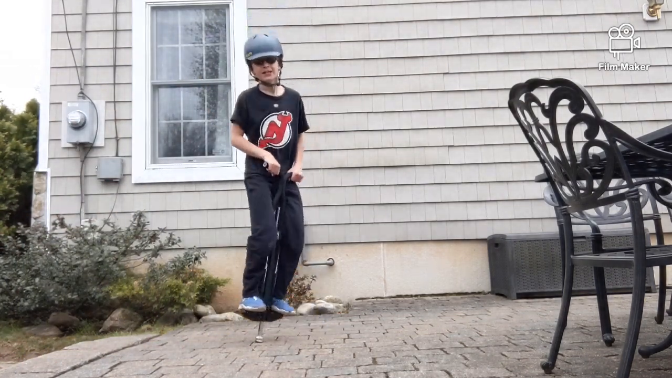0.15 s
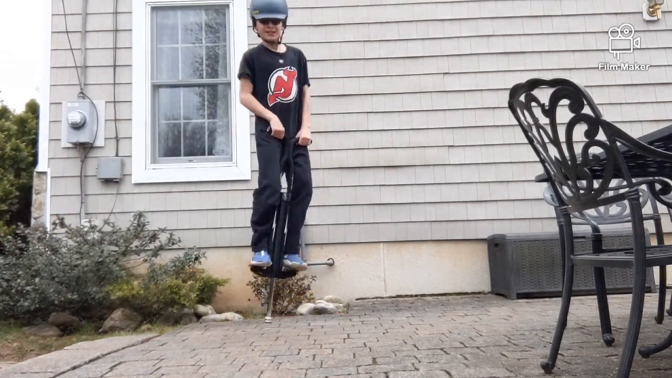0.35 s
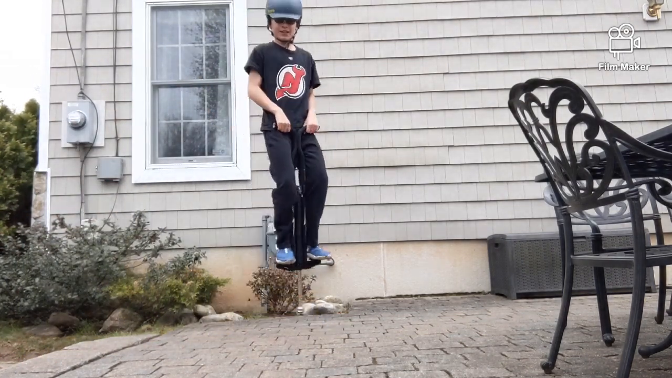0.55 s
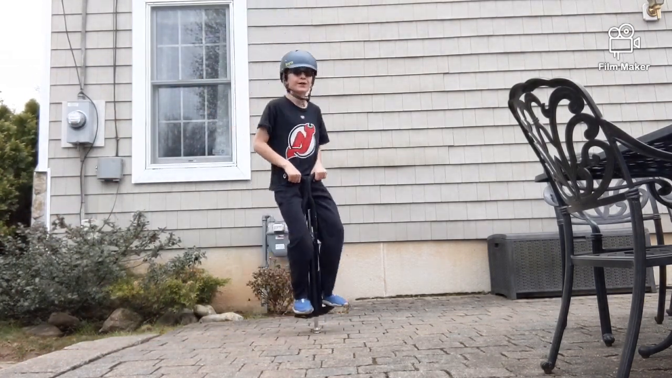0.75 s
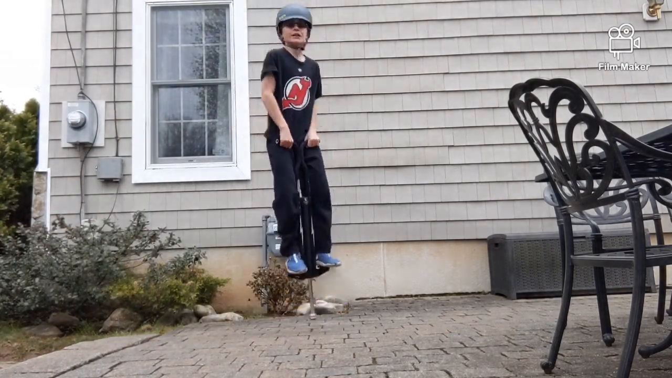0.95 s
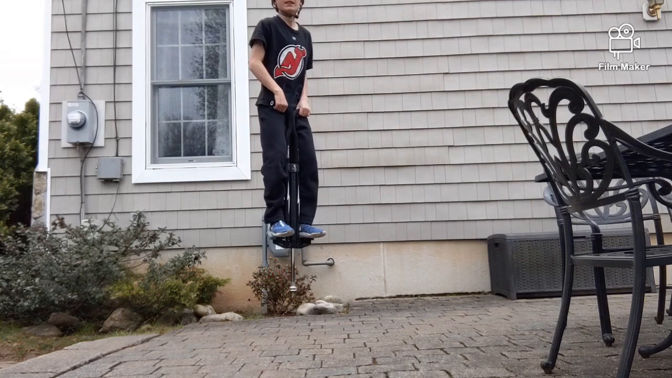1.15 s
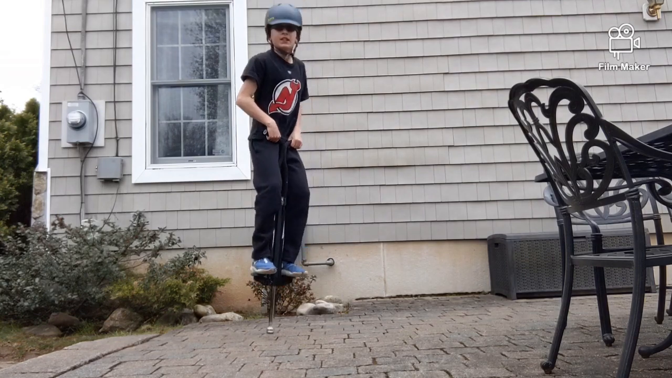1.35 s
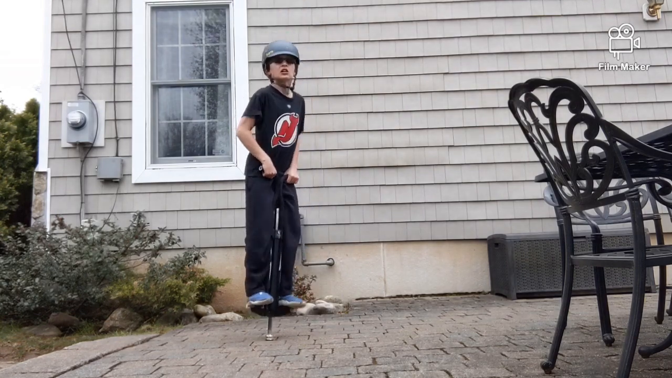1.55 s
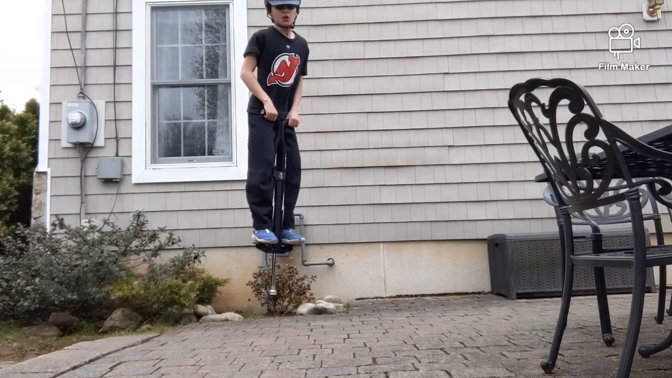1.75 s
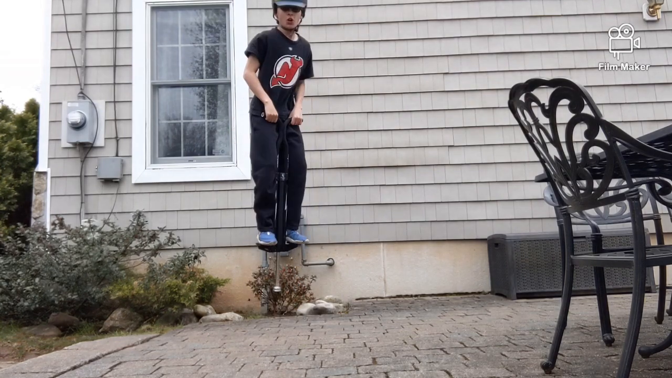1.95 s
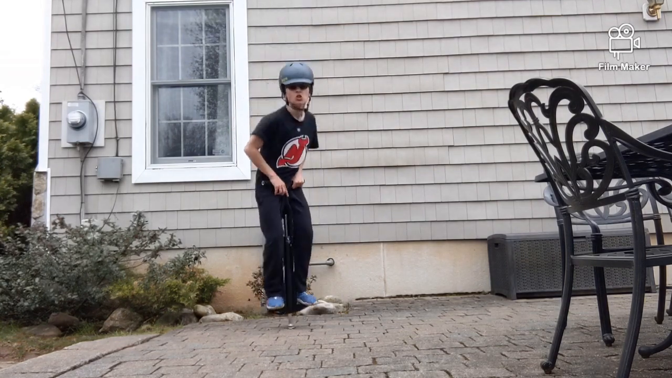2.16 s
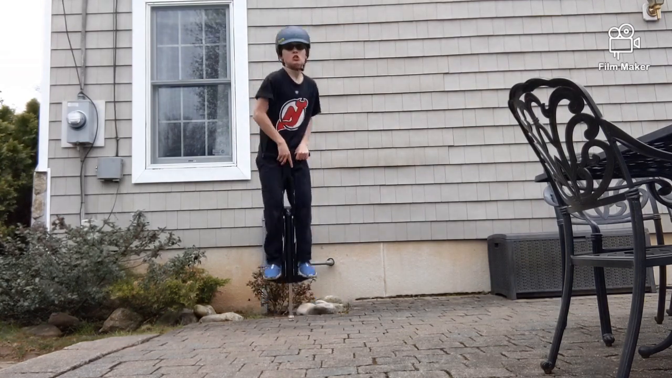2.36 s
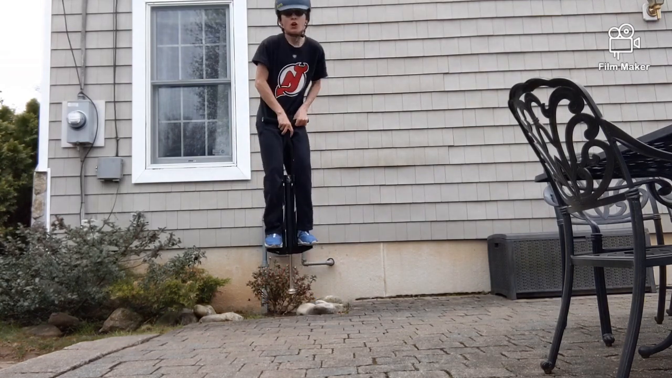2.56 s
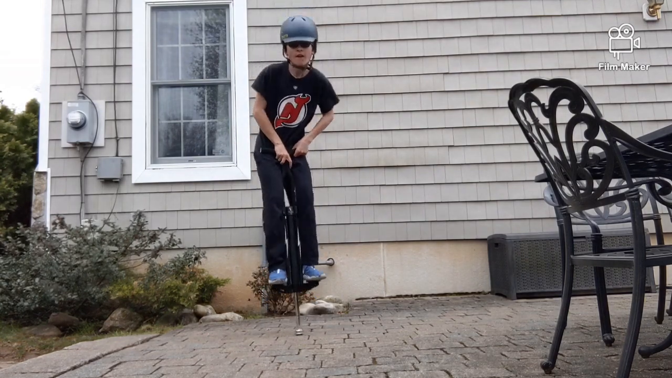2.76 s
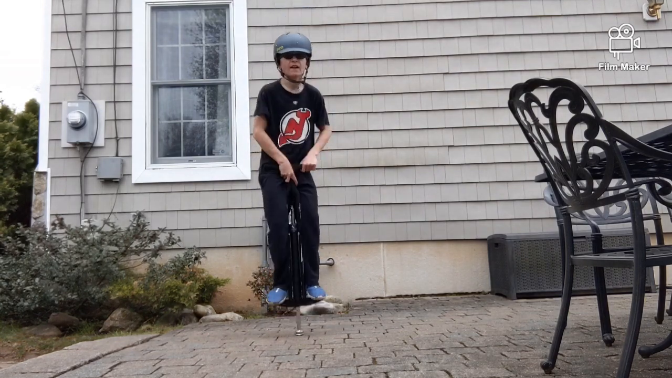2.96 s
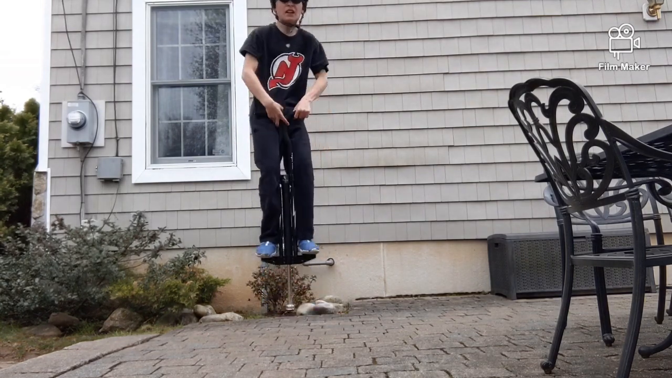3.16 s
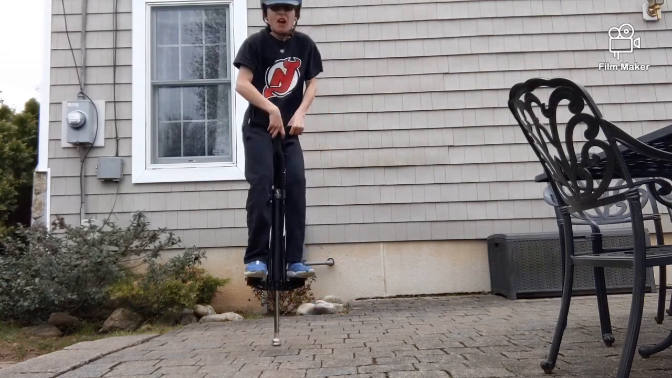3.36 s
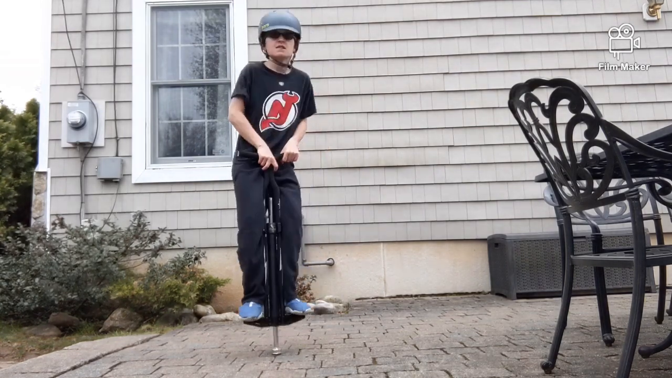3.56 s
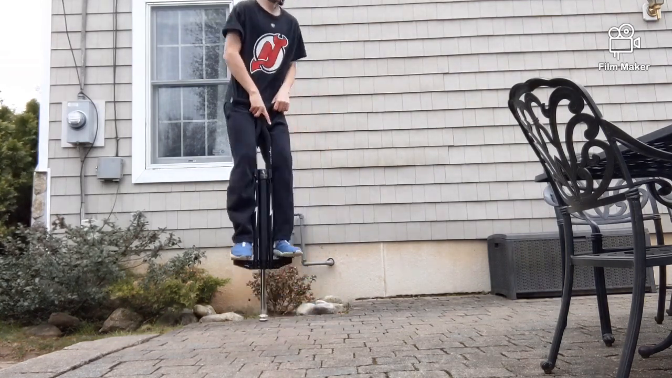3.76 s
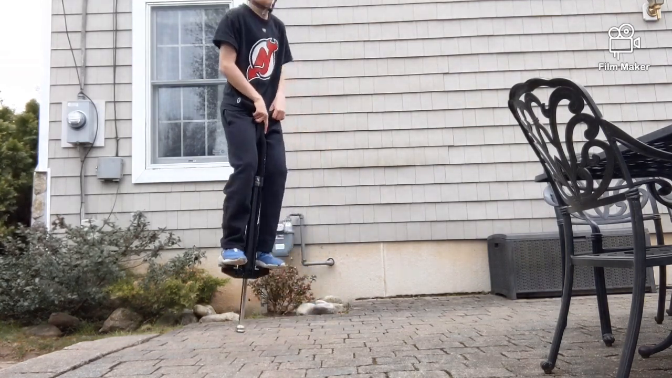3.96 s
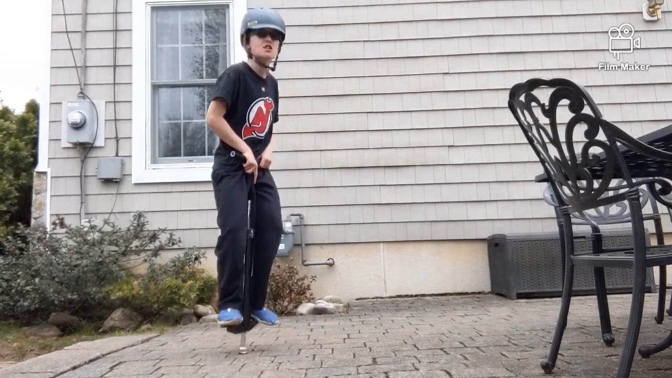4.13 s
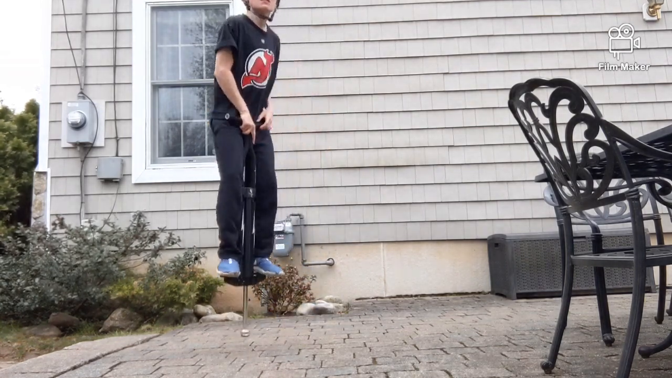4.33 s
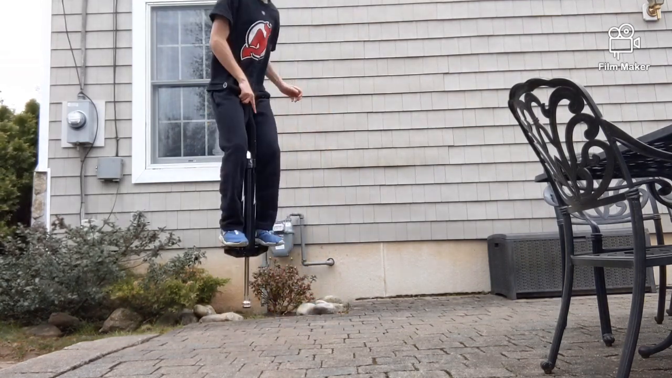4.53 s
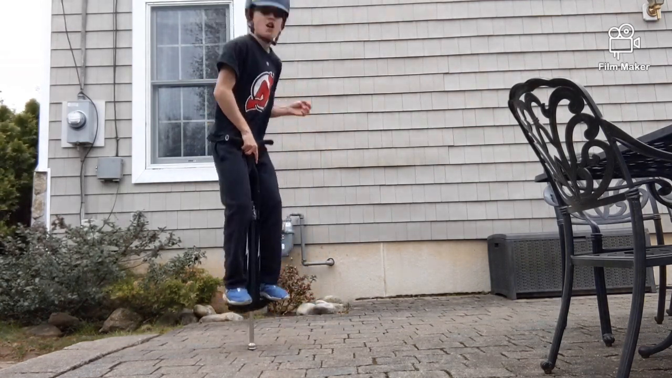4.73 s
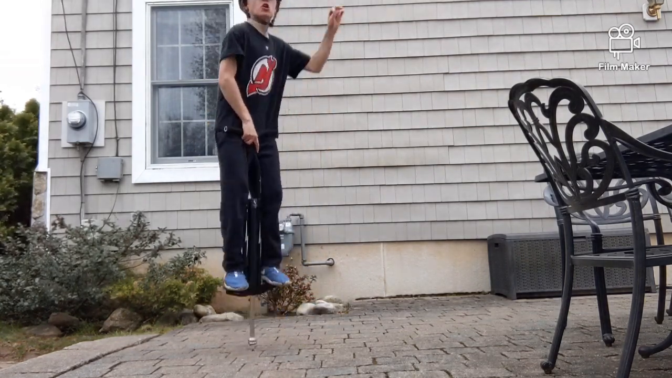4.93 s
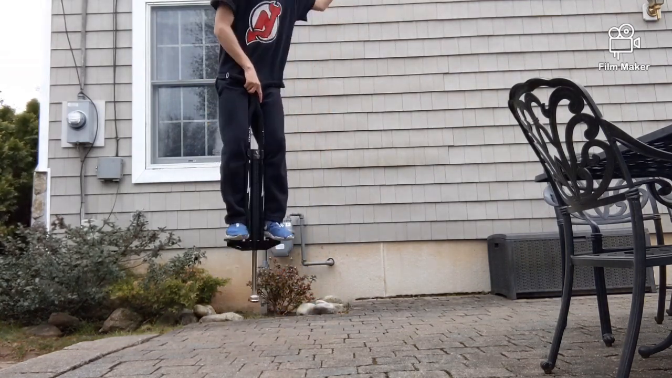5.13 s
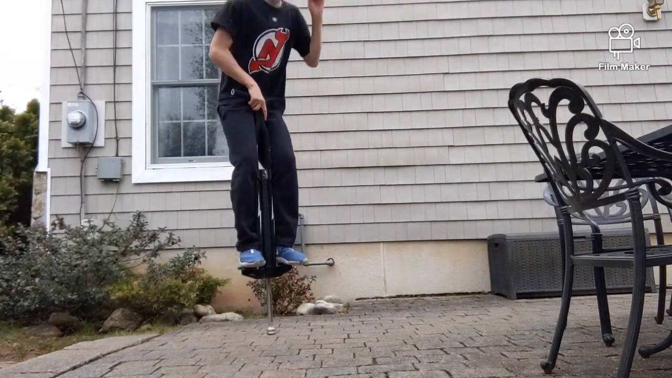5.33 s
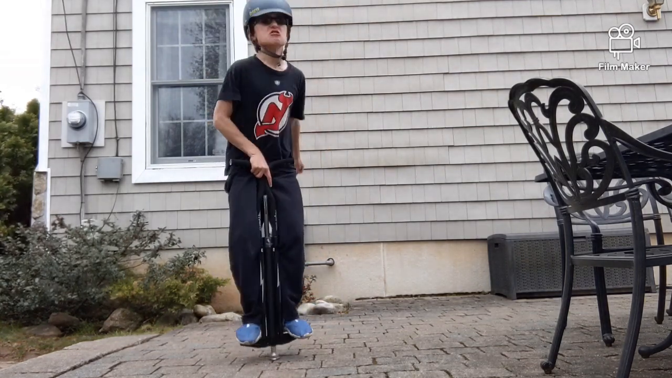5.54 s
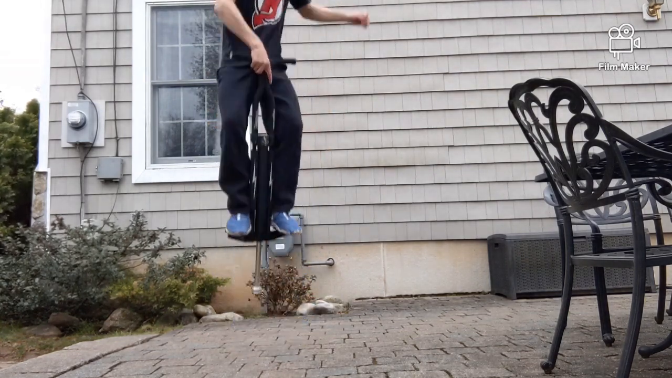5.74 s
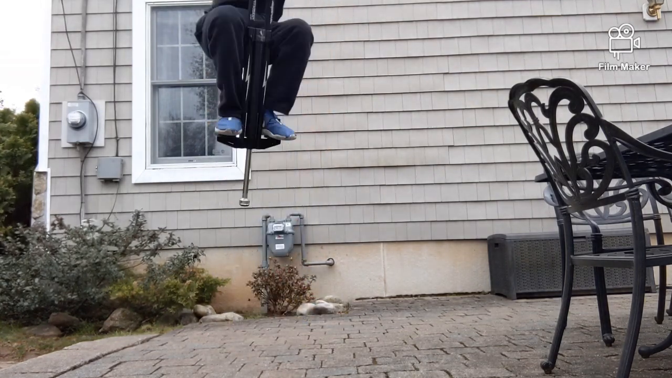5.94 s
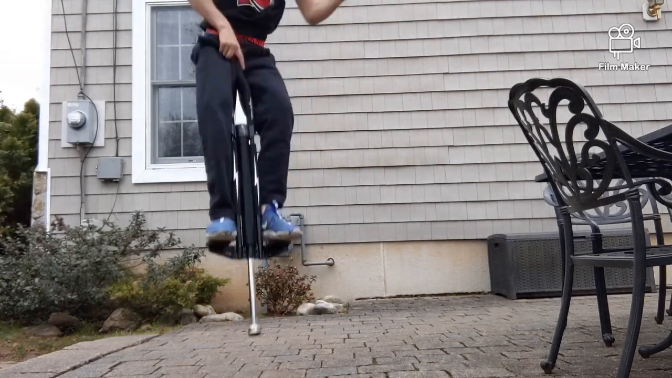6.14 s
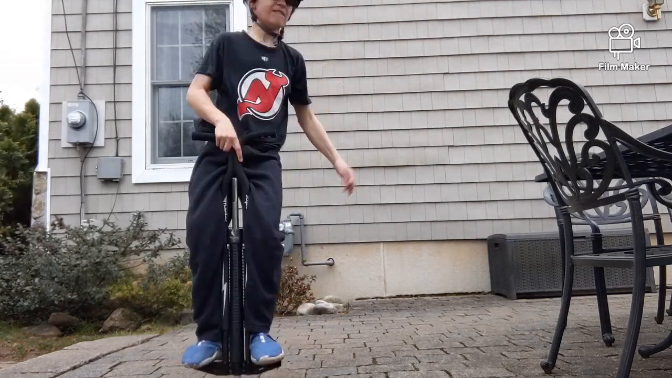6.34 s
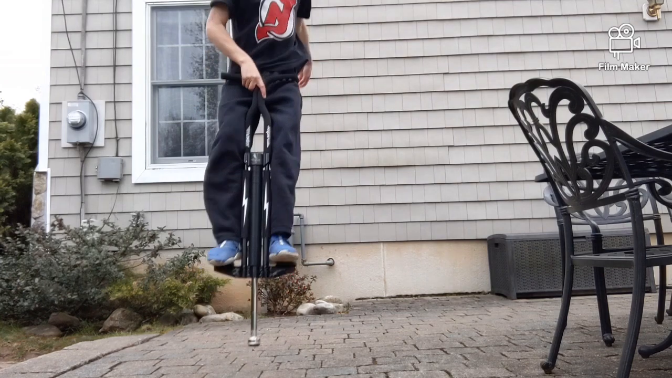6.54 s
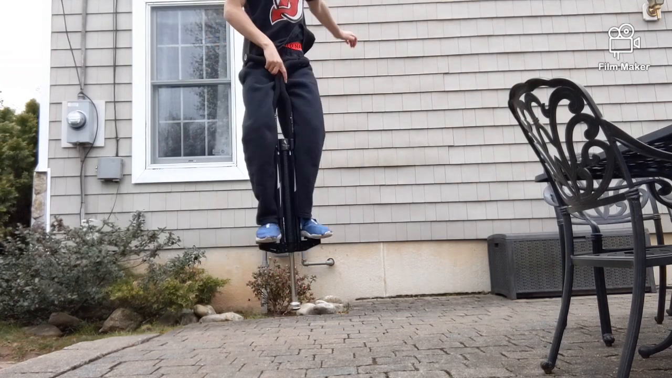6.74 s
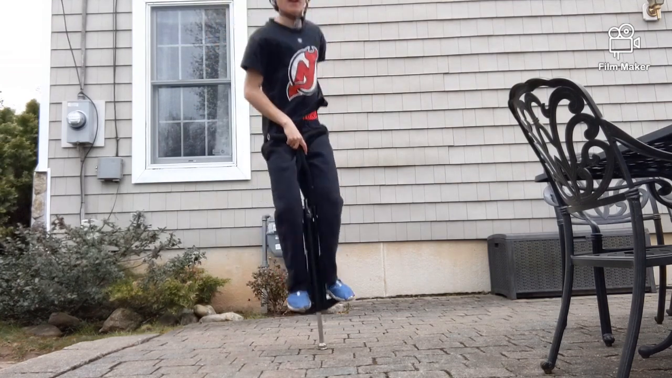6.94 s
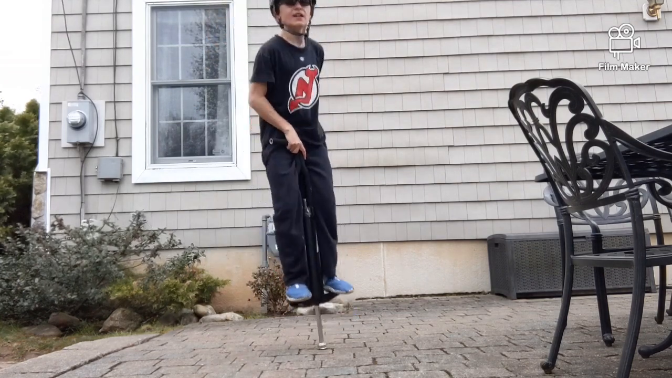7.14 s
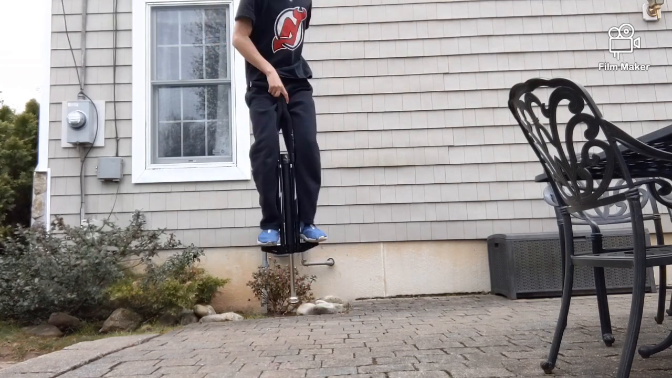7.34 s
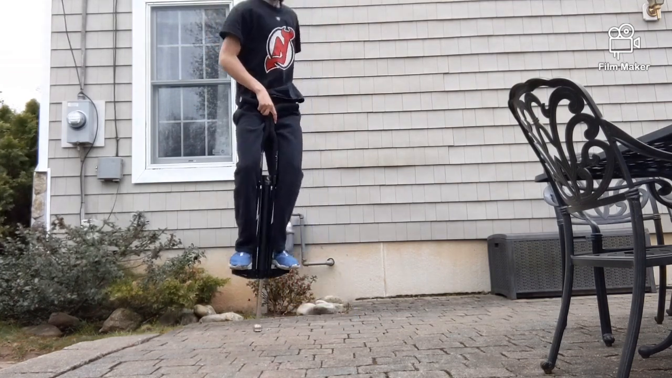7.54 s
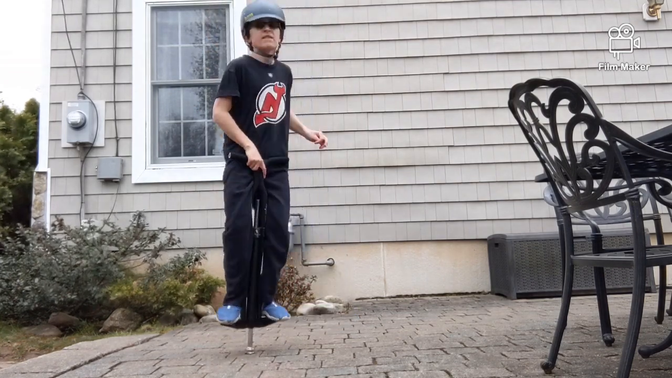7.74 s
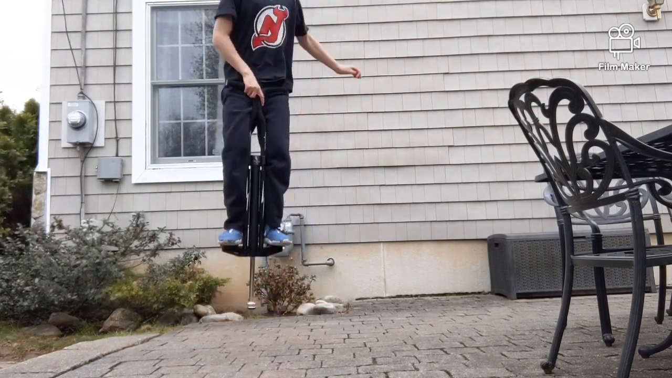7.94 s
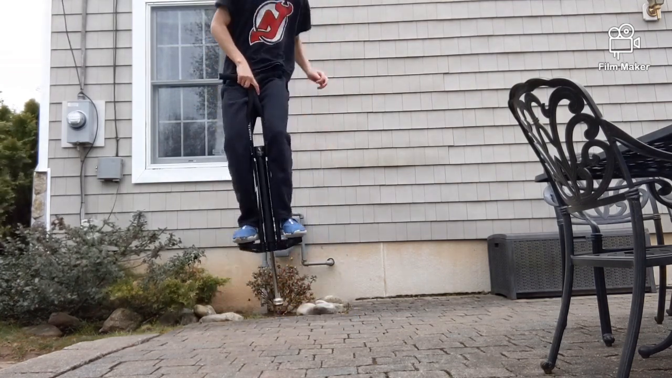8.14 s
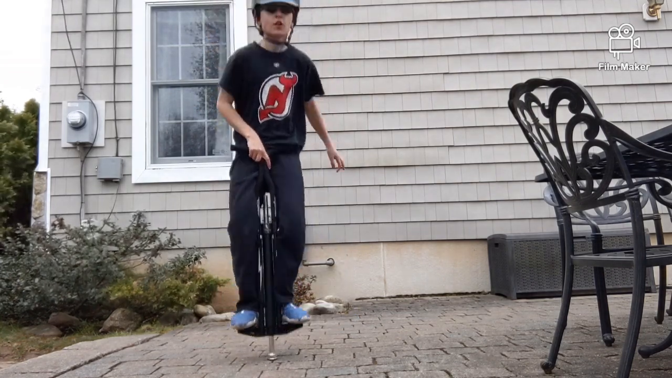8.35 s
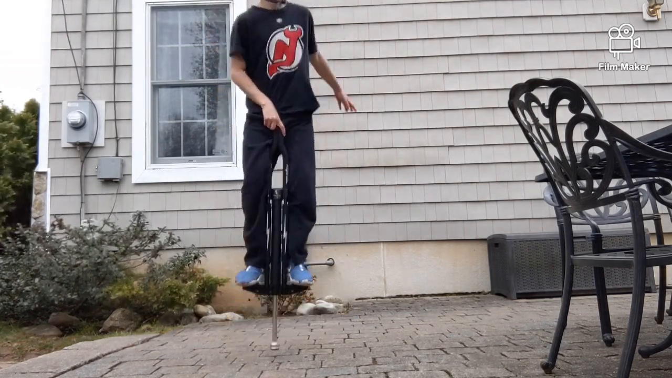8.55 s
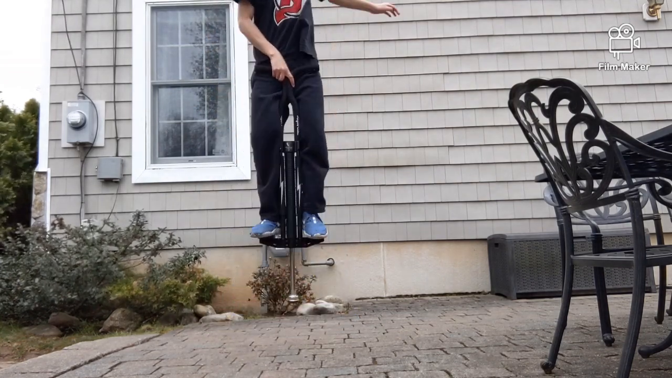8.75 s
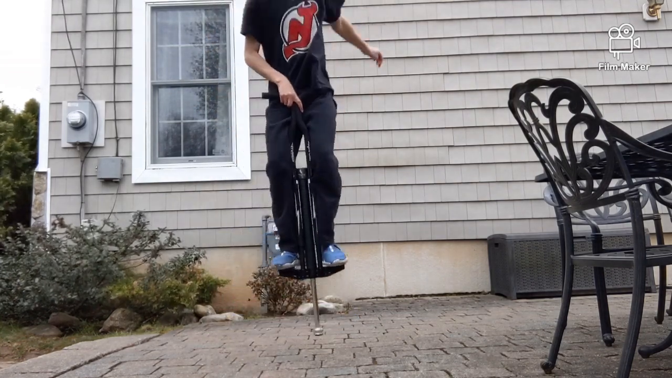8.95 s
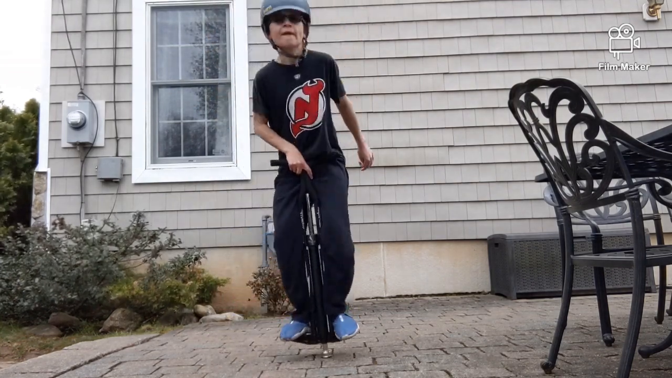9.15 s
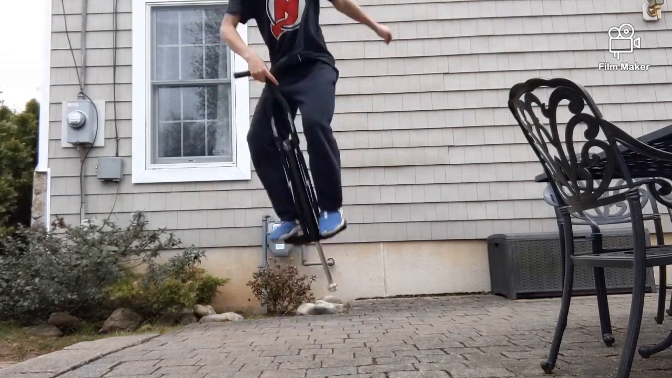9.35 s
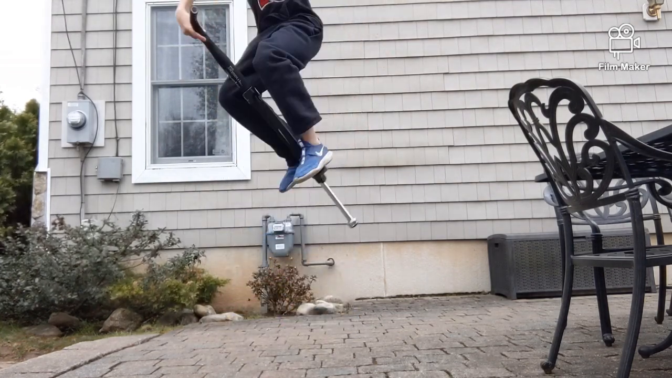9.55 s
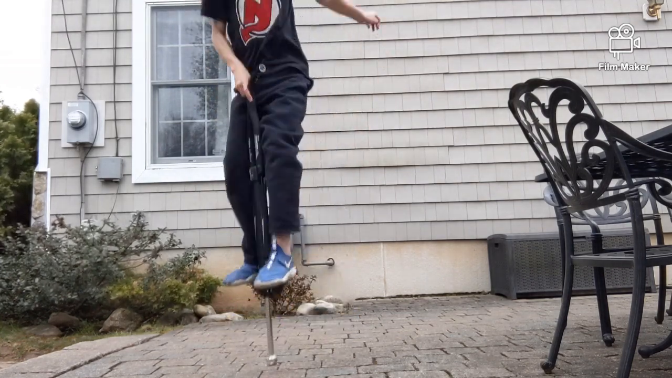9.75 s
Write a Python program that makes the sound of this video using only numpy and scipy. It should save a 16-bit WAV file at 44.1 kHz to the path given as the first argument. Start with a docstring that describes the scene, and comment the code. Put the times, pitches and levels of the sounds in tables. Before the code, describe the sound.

A pogo stick bounces steadily on a stone patio, each landing clacking and scraping, then snapping metallically at lift-off, with occasional squeaks.

```python
"""A stone patio in front of a house wall; a pogo stick bounces about three times in two seconds.
Each bounce: the foot thuds on the stone, shaft and spring scrape down, halt, scrape up again, and the
shaft snaps against its top stop. These are shaped noise bursts, and resonators ring as the steel tube.
Some strokes squeak as gliding tones; a light breeze, slow filtered noise, touches the microphone's two ports."""
import sys
import numpy as np
from scipy import signal
from scipy.fft import rfft, irfft, next_fast_len
from scipy.io import wavfile

SR = 44100
rng = np.random.default_rng(int(sys.argv[2]) if len(sys.argv) > 2 else 0)


def bounce(signal):
    """Save signal as a 16-bit WAV file at the path given by the first command-line argument."""
    frames = np.transpose(np.atleast_2d(signal))
    limited = np.clip(frames, -1, 1)
    pcm = np.round(limited * 32767).astype(np.int16)
    wavfile.write(sys.argv[1], SR, pcm)


N = 431738
TIME = np.arange(N) / SR


def from_db(db):
    """Decibels to gain."""
    return 10 ** (np.asarray(db) / 20)


def rms_one(x):
    """Scale to unit rms."""
    return x / np.sqrt(np.mean(x ** 2) + 1e-20)


def at_hz(points, hz):
    """Read a table on a log-frequency axis."""
    freq, value = np.transpose(points)
    return np.interp(np.log(hz + 1), np.log(freq), value)


def add(track, s, sound):
    """Mix a sound into a track at a time in seconds."""
    start = max(round(s * SR), 0)
    track[..., start:start + sound.shape[-1]] += sound[..., :N - start]


def lowpass(x, hz):
    """Gentle second-order low-pass."""
    return signal.sosfilt(signal.butter(2, min(hz, .45 * SR), fs=SR, output="sos"), x + 1e-18)


def highpass(x, hz, order):
    """Butterworth high-pass."""
    return signal.sosfilt(signal.butter(order, hz, "high", fs=SR, output="sos"), x)


def colour(x, spectrum, lift_db=0, size=1024):
    """Causal (minimum-phase) filter of unit power with this spectrum, its treble lifted above 5 kHz."""
    hz = np.fft.rfftfreq(size, 1 / SR)
    treble_db = lift_db * at_hz([(5000, 0), (9000, 1)], hz)
    gain = rms_one(from_db(at_hz(spectrum, hz) + treble_db))
    # fold the cepstrum onto positive times so that nothing sounds before the contact
    cepstrum = irfft(np.log(gain))
    cepstrum[1:size // 2] *= 2
    cepstrum[size // 2 + 1:] = 0
    response = irfft(np.exp(rfft(cepstrum)))
    return signal.fftconvolve(np.atleast_2d(x), response[None], axes=-1)


def resonance(x, hz, width_hz):
    """Two-pole band-pass with gain 1 on top."""
    r = np.exp(-np.pi * width_hz / SR)
    feedback = [1, -2 * r * np.cos(2 * np.pi * hz / SR), r * r]
    return signal.lfilter(np.array([1, 0, -1]) * (1 - r * r) / 2, feedback, x + 1e-18)


def slow(n, hz):
    """Random wander of spread 1."""
    return rms_one(lowpass(rng.standard_normal(n + SR // 10), hz)[-n:])


WIND_DB, WIND_RISE_DB_PER_S, GUST_DB, WASH_DB = -52.5, 0.54, 1.3, -54.5   # the breeze slowly freshens
# The garden air as the microphone hears it. Each row: frequency in Hz, relative spectrum level in dB per Hz.
GARDEN_COLOUR = [(15, -38), (25, 1), (82, -3.5), (229, -21), (309, -18.5), (394, -23), (560, -21.5),
                 (607, -19), (1130, -25.5), (1700, -26.5), (2220, -31), (3160, -30), (6050, -40.5),
                 (9840, -41), (16000, -48.5)]
# How alike that air is at the two ports. Each row: frequency in Hz, left-right correlation from -1 to 1.
AIR_LIKENESS = [(30, .1), (70, 0.6), (150, 0.97), (500, 0.63), (1500, 0.078), (5000, 0.11)]


def garden():
    """Lumpy wind on the ports under a smooth distant wash."""
    size = next_fast_len(N)
    hz = np.fft.rfftfreq(size, 1 / SR)
    mid, side = rfft(rng.standard_normal((2, size))) * from_db(at_hz(GARDEN_COLOUR, hz))
    alike = np.clip(at_hz(AIR_LIKENESS, hz), -1, 1)
    air = np.sqrt(1 + alike) * mid + np.sqrt(1 - alike) * side * [[1], [-1]]
    low = 1 / (1 + (hz / 160) ** 4)   # wind lies mostly below 160 Hz, the wash above
    wind = rms_one(irfft(air * low, size)[:, :N])
    wash = rms_one(irfft(air * (1 - low), size)[:, :N])
    wind_db = WIND_DB + WIND_RISE_DB_PER_S * TIME + GUST_DB * slow(N, hz=10)
    return wind * from_db(wind_db) + wash * from_db(WASH_DB)


def scatter(t, t60, alike_below_hz):
    """Stereo reflections of unit power that die away; long waves reach both ports alike."""
    own = rng.standard_normal((2, len(t)))
    shared = rng.standard_normal(len(t))
    both = highpass(own, alike_below_hz, order=2) + lowpass(shared, alike_below_hz)
    return rms_one(both * from_db(-60 * t / t60)) / np.sqrt(len(t))


LEAD_S = 12 / SR   # room for the front skirt of a fractional delay


def surroundings(lag_us, ground_s, wet_db, low_t60, high_t60):
    """The paths from one spot to the two ports: direct, off the paving, and round the yard."""
    t = TIME[:SR // 2]
    arrival = (t - LEAD_S - np.array([[lag_us], [0]]) * 1e-6) * SR   # in samples; the left port lags
    paving = 0.23 * lowpass(np.sinc(arrival - ground_s * SR), hz=3520)
    direct = np.sinc(arrival) + paving
    high = scatter(t, high_t60, alike_below_hz=1220)
    low = 1.87 * lowpass(scatter(t, low_t60, alike_below_hz=1300), hz=2330)
    return direct + from_db(wet_db) * (high + low) * (1 - np.exp(-t / 0.0046))


# Pick-up of the microphone's two ports. Each row: frequency in Hz, left minus right in dB.
PORT_BALANCE = [(300, 0), (900, 0.5), (1800, 3.5), (2600, 1.5), (6000, 2), (9000, -1), (12500, -4),
                (16000, -3)]


def patio(x):
    """Every bounce lands on a new spot with reflections of its own; each port has its own colour."""
    out = np.zeros((2, N))
    starts = [max(round((row[0] - .01) * SR), 0) for row in LANDINGS]
    for start, end, (*_, lag_us) in zip(starts, starts[1:] + [N], LANDINGS):
        paths = surroundings(lag_us, ground_s=.0031, wet_db=-9.5, low_t60=0.35, high_t60=0.16)
        add(out, start / SR - LEAD_S, signal.fftconvolve(x[:, start:end], paths, axes=-1))
    size = next_fast_len(N + SR // 10)
    balance_db = at_hz(PORT_BALANCE, np.fft.rfftfreq(size, 1 / SR))
    sides = from_db(balance_db * np.array([[.5], [-.5]]))
    return irfft(rfft(out, size) * sides, size)[:, :N]


# Loose parts that stir in mid-air. Each row: start in seconds, level in dB, centre in Hz, width in Hz.
RATTLES = [(4.386, -59, 10000, 3000), (6.096, -54, 10000, 500), (9.613, -46.5, 3360, 700),
           (9.618, -48.5, 10700, 1490)]


def rattles():
    """Spring and pegs rub briefly as the rider shifts in the air: swelling bands of noise."""
    out = np.zeros(N)
    t = TIME[:SR // 10]
    swell = t / 0.006 * np.exp(1 - t / 0.0062)
    for s, db, hz, width_hz in RATTLES:
        rub = rms_one(resonance(rng.standard_normal(len(t)), hz, width_hz))
        add(out, s, from_db(db) * swell * rub)
    return out


def squeak(pitch_hz, rough):
    """Stick-slip: a short gliding tone whose pitch jitters by the share `rough`."""
    n = len(pitch_hz)
    turn = 2 * np.pi * np.cumsum(pitch_hz * (1 + rough * slow(n, 250))) / SR
    tone = np.sin(turn) + .2 * np.sin(2 * turn)
    return np.sqrt(np.hanning(n)) * (1 + .3 * slow(n, 120)) * tone


# the shaft turns round this long after landing; pitch climbs to either side
BOTTOM_S, SQUEAK_BEND_PER_S2 = .145, 20.8
# under a heavy load the spring grinds in a falling tone
GRIND_AT_S, GRIND_LENGTH_S, GRIND_START_HZ, GRIND_END_HZ, GRIND_DB = 6.228, .07, 2800, 1059, -25.5
# Squeaks of the bushing. Each row: start in seconds, length in seconds,
# pitch at the bottom of the stroke in Hz, level in dB.
SQUEAKS = [(.115, .09, 833, -38.5), (.205, 0.073, 840, -40.5), (.825, 0.049, 860, -35),
           (1.53, 0.032, 843, -42), (2.137, 0.091, 887, -41), (2.243, 0.073, 813, -34),
           (2.847, .07, 966, -44.5), (6.351, 0.033, 784, -36)]


def squeaks():
    """On some strokes the bushing binds and squeaks, lowest where the shaft turns round; once the spring grinds."""
    out = np.zeros((2, N))
    bottoms = np.array(LANDINGS)[:, 0] + BOTTOM_S
    for s, length, hz, db in SQUEAKS:
        nearest = bottoms[np.argmin(abs(bottoms - s))]
        from_bottom = s + TIME[:round(length * SR)] - nearest
        pitch_hz = hz * (1 + SQUEAK_BEND_PER_S2 * from_bottom ** 2)
        add(out, s, from_db(db) * squeak(pitch_hz, rough=.025))
    falling_hz = np.geomspace(GRIND_START_HZ, GRIND_END_HZ, round(GRIND_LENGTH_S * SR))
    add(out, GRIND_AT_S, from_db(GRIND_DB) * squeak(falling_hz, rough=.12))
    return out


# Ringing of tube and spring. Each row: frequency in Hz, width in Hz, gain over the contact noise in dB.
TUBE_MODES = [(620, 87, -13.5), (890, 70, -4), (1194, 190, -2.5), (1718, 130, -2), (2035, 100, -5.5),
              (3490, 770, -0.5), (3690, 30, -11.5), (9660, 40, -1.5), (9350, 43, -1), (10400, 360, -13.5),
              (12300, 70, -10.5)]


def tube(x):
    """Every contact also sets the steel ringing: parallel resonators beside the contact itself."""
    return x + sum(from_db(db) * resonance(x, hz, width) for hz, width, db in TUBE_MODES)


def radiated(n, apart_hz=1300):
    """Noise of a long vibrating tube: its short waves reach the two ports only partly alike."""
    own = highpass(rng.standard_normal((2, n)), apart_hz, order=1)
    return rms_one(rng.standard_normal(n) + .55 * own)


COIL_SWING = 0.98   # how strongly the coil resonances come and go in the scrape


def rasp(n):
    """Friction grains, coloured by coil resonances that come and go as the spring rubs along the tube."""
    grains = radiated(n) * from_db(rng.uniform(-7, 7, n))
    coils = np.geomspace(1000, 5000, num=12) * rng.uniform(.93, 1.07, 12)
    ringing = sum(COIL_SWING * slow(n, 14) * resonance(grains, hz, hz / 14) for hz in coils)
    return rms_one(grains + ringing)


# Colour of sliding friction and of the foot's scuff. Each row: frequency in Hz, relative level in dB per Hz.
SCRAPE_COLOUR = [(200, -30), (450, -12), (750, -11.5), (950, -8.5), (1700, -9), (2400, -9), (3500, -5.5),
                 (5000, -4.5), (7300, -13), (8700, -6.5), (9500, -3), (10600, -6.5), (12000, -13.5),
                 (15000, -18.5)]


def scrape(envelope, lift_db):
    """One slide of the shaft: friction with a slightly uneven grip."""
    n = len(envelope)
    grip_db = 1.0 * slow(n, hz=108.7)
    return colour(rasp(n) * envelope * from_db(grip_db), SCRAPE_COLOUR, lift_db)


# going down, the scrape starts at once, sags a little, and dies as the spring brings the rider to a halt
DESCENT_DB, DESCENT_HOLD_S, SAG_DB_PER_S, HALT_DB_PER_S = -29.5, 0.093, 7.5, 517.5
DESCENT_LIFT_DB, LIFT_PER_LOAD = 1, .4   # a heavier load scrapes brighter (dB per dB)
# going up, it swells and fades as a bell: its peak as a share of the time on the ground, its width
REBOUND_PEAK_SHARE, REBOUND_WIDTH_S = .83, 0.023


def slides():
    """Shaft and spring scrape down after each landing and up before each lift-off, hushed in between."""
    out = np.zeros((2, N))
    t = TIME[:SR // 3]
    halt_db = HALT_DB_PER_S * np.maximum(t - DESCENT_HOLD_S, 0)
    descent = from_db(DESCENT_DB - SAG_DB_PER_S * t - halt_db)
    for s, load_db, *_ in LANDINGS:
        add(out, s, from_db(load_db) * scrape(descent, DESCENT_LIFT_DB + LIFT_PER_LOAD * load_db))
    for (s, *_), (off_s, _, rebound_db, lift_db) in zip(LANDINGS, TOP_OUTS):
        ground_s = off_s - s
        from_peak_s = t - REBOUND_PEAK_SHARE * ground_s
        rebound = np.exp(-.5 * (from_peak_s / REBOUND_WIDTH_S) ** 2) * (t < ground_s)
        add(out, s, from_db(rebound_db) * scrape(rebound, lift_db))
    return out


# Shudder of pegs and frame. Each row: frequency in Hz, relative level in dB per Hz.
SHUDDER_COLOUR = [(50, -23), (120, 1.5), (165, -16), (260, 2), (390, -1.5), (480, -9), (620, -3.5),
                  (1000, -25.5), (4000, -67)]


def shudder(t60):
    """The frame's many low modes die away together."""
    t = TIME[:SR // 3]
    return colour(rng.standard_normal(len(t)) * from_db(-60 * t / t60), SHUDDER_COLOUR, size=4096)


def impact(spectrum, lift_db, rise_s, crack_t60, rattle_db, rattle_t60):
    """A hard crack of many close modes, then a weaker buzz of loose parts."""
    t = TIME[:SR // 4]
    decay = from_db(-60 * t / crack_t60) + from_db(rattle_db - 60 * t / rattle_t60)
    envelope = decay * (1 - np.exp(-t / rise_s))
    return colour(radiated(len(t)) * envelope, spectrum, lift_db)


JOLT_DB, RECOIL_DB, RECOIL_S = -28.5, -18, .042   # frame jolt and second touch, against the snap
# Colour of the top stop. Each row: frequency in Hz, relative level in dB per Hz.
SNAP_COLOUR = [(120, -21.5), (270, -12), (700, -13), (1700, -7.5), (3500, -4.5), (5000, -3), (7300, -8),
               (9500, 1), (11000, -4), (15000, -14.5)]
# The shaft hits its stop at lift-off. Each row: time in seconds, snap level in dB,
# level in dB of the scrape that leads up to it, treble lift of that scrape in dB.
TOP_OUTS = [(0.279, -16.5, -29.5, 2), (0.9015, -14, -27.5, 3.5), (1.599, -13.5, -26.5, -1),
            (2.3382, -16, -24.5, 5.5), (3.0066, -15, -31.5, 2), (3.6347, -14.5, -26.5, 1),
            (4.2722, -15.5, -30, -1), (4.932, -14, -26, 4), (5.6327, -8.5, -24.5, 5), (6.451, -11, -24, 1),
            (7.1457, -13, -28.5, 4), (7.8234, -12.5, -24.5, 3.5), (8.526, -13.5, -26.5, 1.5),
            (9.2392, -9, -24, 4.5)]


def top_outs():
    """The spring throws the shaft against its stop: the tube pings, the frame jolts and the shaft rebounds once."""
    out = np.zeros((2, N))
    for s, snap_db, *_ in TOP_OUTS:
        snap = from_db(snap_db) * impact(SNAP_COLOUR, lift_db=0.45, rise_s=0.00014, crack_t60=0.028,
                                         rattle_db=-16.5, rattle_t60=0.2)
        ping = from_db(2) * resonance(snap, hz=9280, width_hz=16)
        add(out, s, snap + ping)
        add(out, s, from_db(snap_db + JOLT_DB) * shudder(t60=0.14))
        again_s = rng.normal(RECOIL_S, .002)
        recoil = impact(SNAP_COLOUR, lift_db=-11, rise_s=0.00068, crack_t60=0.037,
                        rattle_db=-19, rattle_t60=0.09)
        add(out, s + again_s, from_db(snap_db + RECOIL_DB) * recoil)
    return out


def push(hz, t60):
    """The rubber tip squashes against the stone: little more than one slow cycle."""
    t = TIME[:SR // 20]
    return np.sin(2 * np.pi * hz * t) * from_db(-60 * t / t60) * (1 - np.exp(-t / 0.0021))


# a squarer landing thuds more and cracks brighter: ordinary thud, its clack's treble lift, dB of lift per dB of thud
USUAL_THUD_DB, CLACK_LIFT_DB, LIFT_PER_THUD = -36.5, 5.5, 0.75
PUSH_DB, SCUFF_DB = 18, -20   # rubber tip above the thud; scuff against the clack
# Colour of the clack. Each row: frequency in Hz, relative level in dB per Hz.
CLACK_COLOUR = [(200, -2), (700, -9), (1700, -2.5), (3500, -2.3), (5000, -1), (7300, -12.5), (9500, -1.5),
                (11000, -5.5), (15000, -17)]
# The foot meets the stone. Each row: time in seconds, load on the spring in dB above an ordinary bounce,
# clack level in dB, thud level in dB, lag of the left port in microseconds.
LANDINGS = [(0.0325, -2.5, -18, -39, 71), (0.652, -3.5, -20.5, -35.5, 39.5),
            (1.363, -2.5, -19.5, -35.5, 70), (2.0803, -3.5, -19.5, -39, 58), (2.7652, -2, -16, -39, 57),
            (3.3831, -2, -16.5, -36, 66.6), (4.02, -2, -18.5, -38.5, 86), (4.6845, -1, -16.5, -34.5, 81),
            (5.3976, 2.5, -16.5, -33, 71), (6.2013, 5.5, -10.5, -33, 86), (6.9056, 1.5, -16.5, -34.5, 39.4),
            (7.5796, 0, -17.5, -37, 83), (8.2818, 4, -9.5, -39, 71), (9.0018, 2.5, -16, -34, 29.6),
            (9.7584, 5.5, -16.5, -33, 68)]


def landings():
    """The rubber foot scuffs and thuds, then the slack in the stick closes with a clack."""
    out = np.zeros((2, N))
    for s, _, clack_db, thud_db, _ in LANDINGS:
        lift_db = CLACK_LIFT_DB + LIFT_PER_THUD * (thud_db - USUAL_THUD_DB)
        add(out, s - .003, from_db(thud_db + PUSH_DB) * push(hz=190, t60=0.028))
        scuff = colour(np.linspace(0, 1, SR // 200) * radiated(SR // 200), SCRAPE_COLOUR)
        add(out, s - .004, from_db(clack_db + SCUFF_DB) * scuff)
        add(out, s, from_db(thud_db) * shudder(t60=0.36))
        clack = impact(CLACK_COLOUR, lift_db, rise_s=0.0004, crack_t60=0.028,
                       rattle_db=-13.0, rattle_t60=0.17)
        add(out, s, from_db(clack_db) * clack)
    return out


def scene():
    """The stick on the patio, in the open air."""
    steel = tube(landings() + slides() + top_outs())
    return patio(steel + squeaks() + rattles()) + garden()


def record(dry):
    """The highest peaks are rounded and the top is cut steeply above 15.9 kHz."""
    rounded = .8 * np.tanh(dry / .8)
    return signal.sosfilt(signal.ellip(10, .1, 80, 15900, fs=SR, output="sos"), rounded)


dry = scene()
out = record(dry)
bounce(out)
```